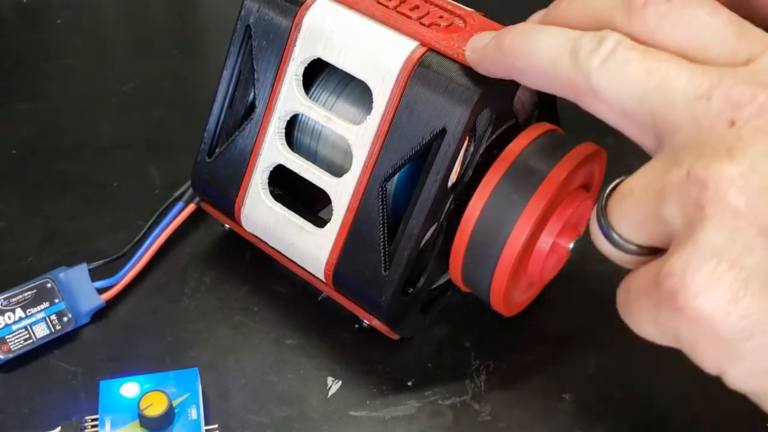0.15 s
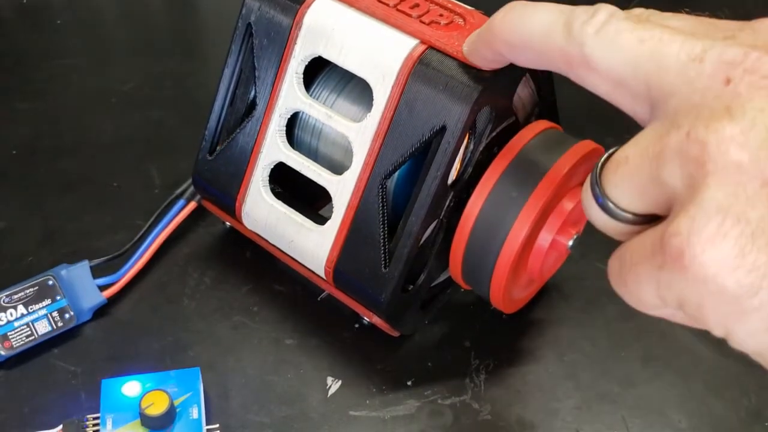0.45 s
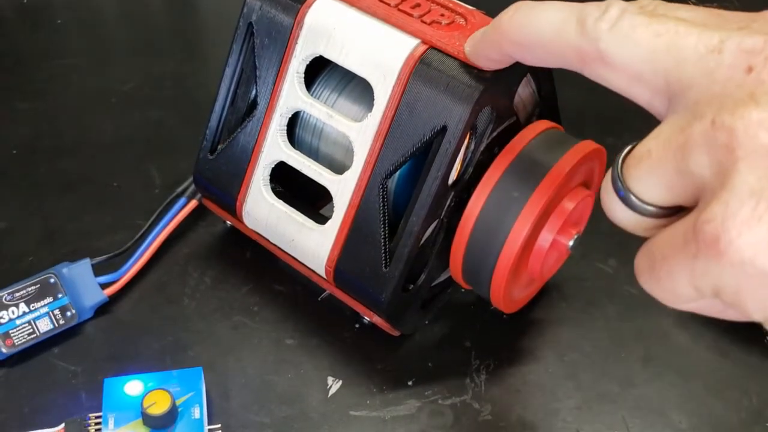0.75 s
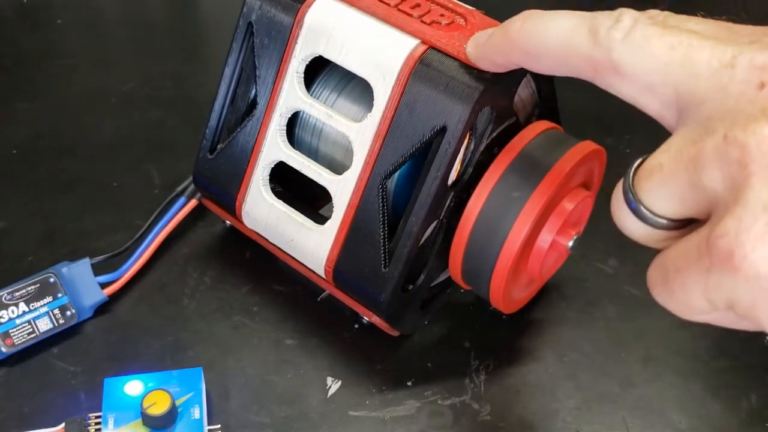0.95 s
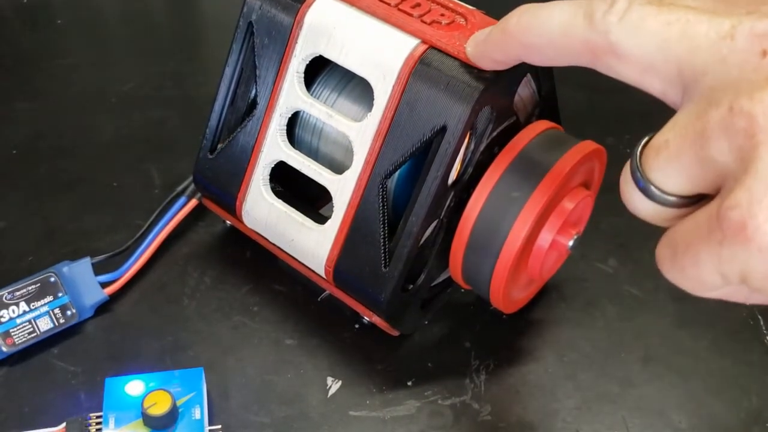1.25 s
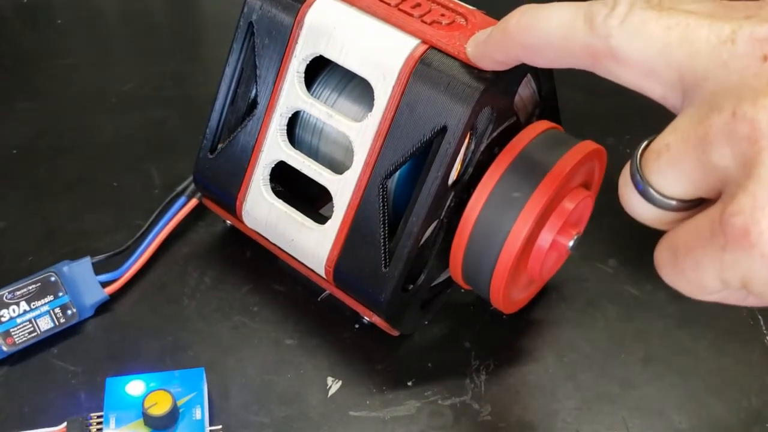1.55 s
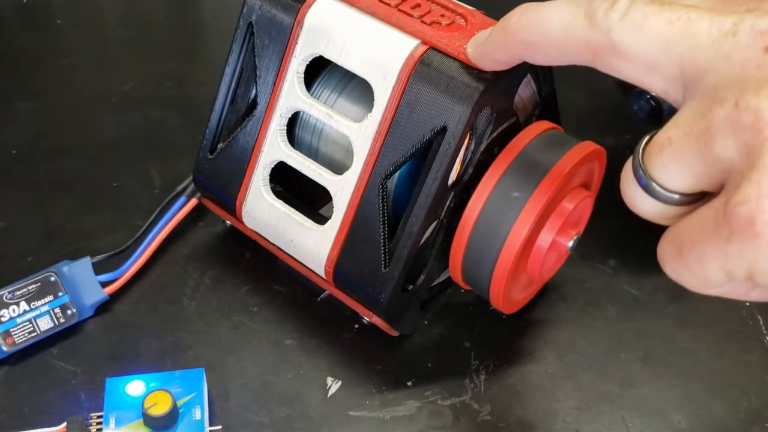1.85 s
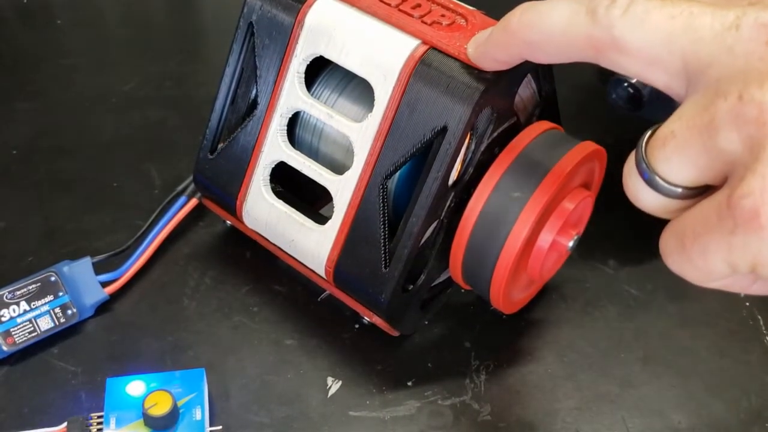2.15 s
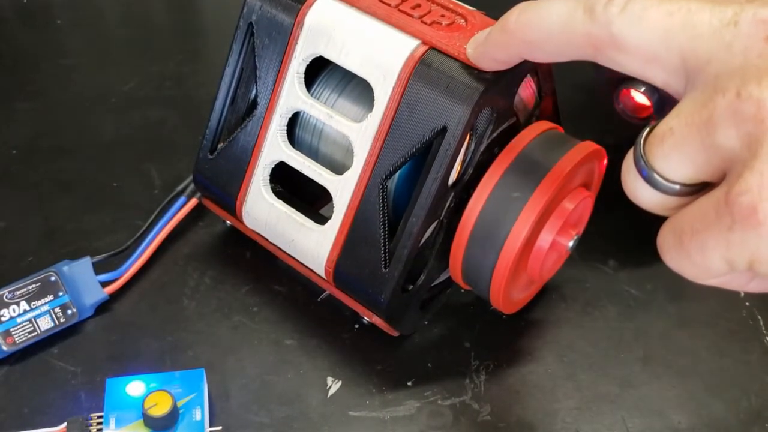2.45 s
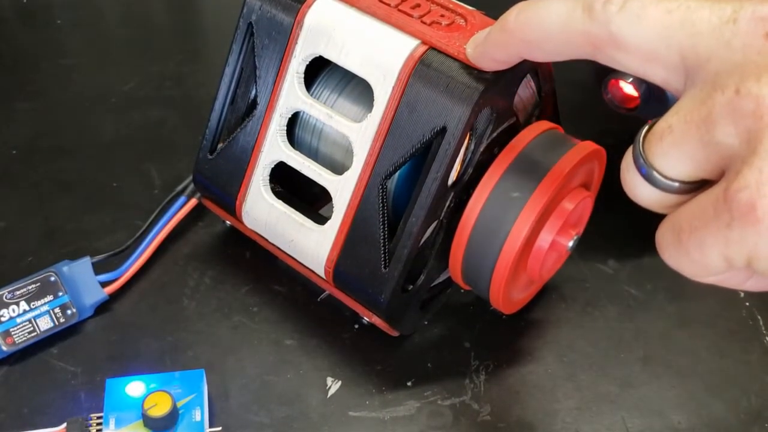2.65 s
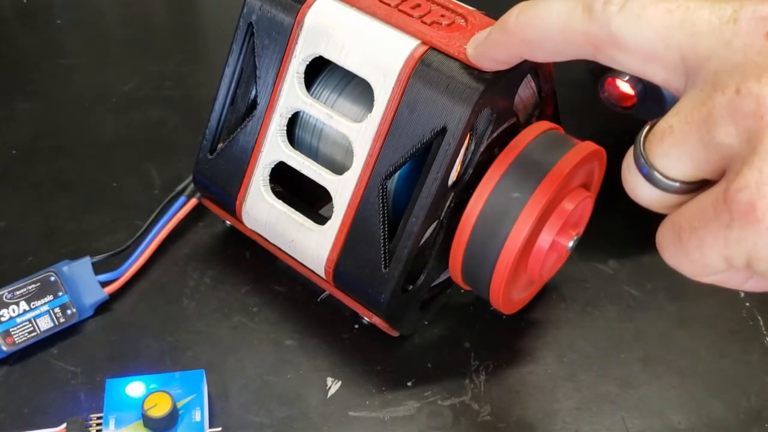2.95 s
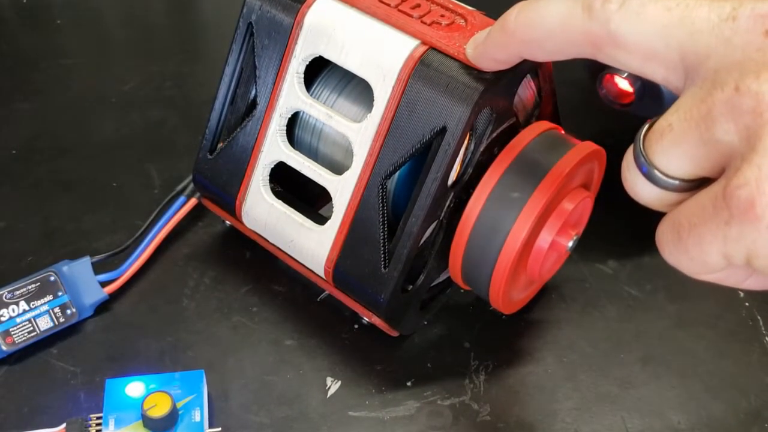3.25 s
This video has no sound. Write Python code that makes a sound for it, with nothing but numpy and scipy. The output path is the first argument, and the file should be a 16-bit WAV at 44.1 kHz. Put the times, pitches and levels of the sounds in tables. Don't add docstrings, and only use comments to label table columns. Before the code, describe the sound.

A small electric motor spins at full speed from 0 to 3.4 seconds without starting or stopping. A hum near 150 hertz carries dense buzzing, whining overtones; loose rotor knocks blur into a hard plastic rattle, with gritty bearing hiss and airy whirr. Pitch creeps up barely, overtones swelling and fading. Low air thuds land left near 1.0 and faintly at 2.4; brief level dips flutter throughout. Close, dry phone pickup, left stronger.

```python
import sys
import numpy as np
from scipy import signal
from scipy.fft import rfft, irfft
from scipy.io import wavfile
from scipy.ndimage import uniform_filter1d, map_coordinates

SR = 44100
rng = np.random.default_rng(int(sys.argv[2]) if len(sys.argv) > 2 else 0)


def invert_db(level):
    return 10 ** (np.asarray(level, dtype=float) / 20)


def generate_wav(signal):
    frames = np.transpose(np.atleast_2d(signal))
    scaled = np.clip(frames, -1, 1) * 32767
    pcm = np.round(scaled).astype(np.int16)
    wavfile.write(sys.argv[1], SR, pcm)


N = 149940


def col(table):
    return np.array(table, float).T


def walk(rate):
    k = int(SR / rate)
    w = uniform_filter1d(uniform_filter1d(rng.standard_normal(N), k), k)
    return w / w.std()


def ring(x, hz, t60):
    pole = np.exp(2j * np.pi * hz / SR - np.log(1000) / (t60 * SR))
    return signal.lfilter([1], [1, -pole], x)


def clicks(times, sizes):
    margin = 16
    out = np.zeros(N + 64)
    at = np.clip(times * SR, 0, N) + margin
    taps = np.floor(at)[:, None] + np.arange(-7, 9)
    d = taps - at[:, None]
    pulse = np.sinc(d) * np.cos(d * np.pi / 16) ** 2
    np.add.at(out, taps.astype(int), sizes[:, None] * pulse)
    return out[margin:N + margin]


def colour(src, table, likeness, lag_ms):
    hz, left, right = col(table)
    bins = np.fft.rfftfreq(N, 1 / SR)
    a, b = rfft(src)
    share = np.interp(bins, *col(likeness))
    late = np.exp(-2j * np.pi * bins * lag_ms / 1000)
    pair = np.array([a, share * a * late + np.sqrt(1 - share ** 2) * b])
    level_db = np.array([np.interp(np.log(bins + 1), np.log(hz), db) for db in (left, right)])
    return irfft(pair * invert_db(level_db) * np.sqrt(SR / 20), N)


def whirr(turns):
    # frequency in Hz, left level in dB, right level in dB.
    whirr_colour = [(40, -85, -83), (113, -51, -60), (252, -59, -65), (624, -56.5, -77),
                    (890, -52.5, -60.5), (2600, -51.5, -67.5), (4050, -53, -59.5), (5100, -68, -59)]
    # frequency in Hz, share of the left heard at the right port (0 to 1).
    whirr_likeness = [(60, .3), (500, 0.93), (2000, 0.15), (5000, 0.36)]
    pulse_db = 0.37 * np.sin(2 * np.pi * (turns - .25))
    src = rng.standard_normal((2, N)) * invert_db(pulse_db + 2.26 * walk(22))
    return colour(src, [(15, -82, -86)] + whirr_colour + [(8900, -76, -76)], whirr_likeness, lag_ms=0.11)


def puffs(t):
    # centre in seconds, level in dB.
    puff_times = [(.01, -48), (.955, -36), (1.04, -31), (.1, -52), (.4, -52), (.7, -52), (.78, -52),
                  (1.19, -52), (1.46, -50), (1.55, -50), (1.78, -52), (1.89, -51), (1.99, -45), (2.09, -52),
                  (2.4, -40), (2.75, -51), (2.84, -51), (3.31, -50), (3.39, -47)]
    puff_hz, puff_s = 60.4, 0.0088
    out = np.zeros(N)
    for s, db in puff_times:
        swell = np.exp(-.5 * ((t - s) / puff_s) ** 2)
        out += 2 * invert_db(db) * swell * np.sin(2 * np.pi * puff_hz * (t - s))
    return out


def grooves(turns):
    points, memory_turns = 300, 55
    keep = np.exp(-1 / memory_turns)
    renew = np.sqrt(1 - keep ** 2)
    fresh = rng.standard_normal((2, int(turns[-1]) + 3, points))
    fresh[:, 0] /= renew
    track = signal.lfilter([renew], [1, -keep], fresh, axis=1)
    return np.array([map_coordinates(row.ravel(), [turns * points]) for row in track])


def rattle(turns):
    # shaft angle in turns, level in dB, decay in turns.
    bursts = [
        (.31, 7.5, 0.12),
        (.43, -3, .1),
        (.6, 11.5, 0.049),
    ]
    # low edge in Hz, high edge in Hz, extra flare in dB.
    flare_bands = [
        (0, 6400, -9),
        (6450, 9400, 4.5),
        (9380, 12500, 0.5),
        (12470, 22050, -2.5),
    ]
    # frequency in Hz, left level in dB, right level in dB.
    rattle_colour = [(3060, -53, -73), (5030, -77, -82), (6400, -66, -80), (6770, -52.5, -58),
                     (8800, -57.5, -56.5), (9900, -52.5, -62), (13100, -50, -55), (15500, -52, -54)]
    # frequency in Hz, share of the left heard at the right port (0 to 1).
    rattle_likeness = [(5000, 0.22), (7100, 0.23), (7700, 1), (9000, 1), (9600, 0.36), (12000, 0.34),
                       (14000, 0.6), (15500, 0.85)]
    repeat, spike_db = 0.58, 2.5
    fresh = rng.standard_normal((2, N)) * invert_db(spike_db * rng.standard_normal((2, N)))
    grit = repeat * grooves(turns) + np.sqrt(1 - repeat ** 2) * fresh / fresh.std()
    bins = np.fft.rfftfreq(N, 1 / SR)
    src = 0
    for lo, hi, flare_db in flare_bands:
        gate = np.ones(N)
        for angle, db, decay in bursts:
            since = (turns - angle) % 1
            gate += invert_db(db + flare_db + 2.4 * walk(70)) * np.exp(-since / decay)
        band = grit * gate * invert_db(0.4 * walk(6.9))
        src = src + irfft(rfft(band / band.std()) * ((bins >= lo) & (bins < hi)), N)
    table = [(1500, -80, -89)] + rattle_colour + [(21900, -40.5, -46)]
    return colour(src, table, rattle_likeness, lag_ms=0)


def knocks(turns, t):
    # shaft angle in turns, left level in dB, right level in dB, ring in Hz, jitter in ms.
    knock_angles = [
        (0.054, -19, -45, 1500, 0.011),
        (0.316, -3, -9, 2390, 0.016),
        (0.434, -10, -14.5, 2747, 0.018),
        (0.609, -6, -14, 3454, 0.031),
        (0.697, -13, -18, 2220, 0.05),
        (0.932, -19.5, -25, 1800, 0.079),
    ]
    # frequency in Hz, T60 in seconds, left level in dB, right level in dB.
    frame_modes = [(325, 0.018, -30, -24), (550, 0.012, -40, -38), (843, 0.015, -29.5, -13.5),
                   (1075, 0.0039, -31, -46), (1600, 0.0064, -24.5, -23.5), (2220, 0.025, -22.5, -47.5),
                   (2560, 0.016, -31, -19), (2860, 0.0067, -20.5, -27), (3463, 0.011, -24, -31),
                   (4050, 0.01, -41, -27.5), (5610, 0.0049, -17.5, -32), (6690, 0.0074, -34, -46),
                   (8500, 0.0062, -54, -35)]
    snap_t60_s, scatter_db, wander_db, right_lag_s = 0.0022, 1.06, 0.75, 0.095 / 1000
    whole = np.arange(int(turns[-1]))
    out = np.zeros((2, N))
    drive = np.zeros(N)
    for angle, left, right, hz, jitter_ms in knock_angles:
        early_late, hardness = rng.standard_normal((len(whole), 2)).T
        at = np.interp(whole + angle, turns, t)
        size = invert_db(scatter_db * hardness + wander_db * walk(6.0)[(at * SR).astype(int)])
        at = at + jitter_ms * early_late / 1000
        out[0] -= invert_db(left) * ring(clicks(at, size), hz, snap_t60_s).imag
        out[1] -= invert_db(right) * ring(clicks(at + right_lag_s, size), hz, snap_t60_s).imag
        drive += invert_db(left) * clicks(at, size)
    for k, (hz, t60, left, right) in enumerate(frame_modes):
        z = ring(drive, hz, t60)
        out[0] += (-1) ** k * invert_db(left) * z.imag
        out[1] += (-1) ** (k // 2) * invert_db(right) * z.real
    return out


def settle(x, turns):
    # multiple of shaft rate (1 to 60), left level in dB, right level in dB, left and right change in
    # dB from start to end.
    order_lines = [(1, -21.5, -27.5, -0.5, 0.0), (2, -30.5, -39, -2.0, -3), (3, -33.5, -44.5, 0.5, 3),
                   (4, -32.5, -42.0, 1.0, -4.0), (5, -32.5, -47, -1.0, -13), (6, -31.5, -34.5, 2.5, 0.5),
                   (7, -28, -31, -1.5, 1.5), (8, -30, -35, 2.5, 2), (9, -36, -46.5, -3, 6),
                   (10, -29.5, -34.5, -2.5, 1.5), (11, -29, -47.5, -0.5, -1), (12, -37, -31.5, 23, 6),
                   (13, -39.5, -32.5, -4, 1), (14, -26.5, -31, -1, -11), (15, -30, -35, -4.5, 3),
                   (16, -31.5, -35.5, 13, -7), (17, -28.5, -36, -4, 11), (18, -36, -35, 2, 9),
                   (19, -28.5, -32.5, -1.5, -3.5), (20, -43.5, -40, -6, 1), (21, -31.5, -57, 1, -1),
                   (22, -37, -49, -13, 2), (23, -33, -36, -14, 7), (24, -27.5, -40, 1.5, -10),
                   (25, -36.0, -52, -3, -7.5), (26, -44, -47, -3, -0.5), (27, -27, -38.5, -3, -1.0),
                   (28, -39, -53.5, 8, 0), (29, -37.5, -61, -6, -1), (30, -44, -50.5, -18, -10.5),
                   (31, -47.5, -59, 15, 11), (32, -49, -56, 18, 10), (33, -44, -48, -1, -4),
                  (34, -60, -70, -5, 0), (35, -38, -55, 0, 1.0), (36, -43, -60, 3, 7),
                  (37, -51, -43, -8, 3), (38, -50, -45, 0, 2), (39, -39, -64, -1, -3),
                  (40, -54.5, -44.5, 6, -2.5), (41, -50, -72, 29, 12.0), (42, -61, -53, -3, 7),
                  (43, -45, -62, -2, 10), (44, -41.5, -53, -4, 9), (45, -39.5, -55, 11, 1),
                  (46, -35.5, -44, -1, -4), (47, -37, -60.0, 10.0, -1.0), (48, -74, -57, 6, -3.0),
                  (49, -41.5, -46, -0.5, -1), (50, -34, -66, -1, 5), (51, -51.5, -64, 3.5, 4.0),
                  (52, -67, -62, -2.0, 7.5), (53, -61, -60, -8, -11), (54, -40, -43.0, -0.5, 3),
                  (55, -39, -42, -6, -5), (56, -42, -46, -3.5, -5.5), (57, -56, -51.5, -0.5, 2),
                  (58, -52, -55, -10, -11), (59, -51, -42, 0.5, -6), (60, -59, -57, -0.5, 3)]
    # frequency in Hz, lead of the left port over the right in radians.
    port_lead = [(150, 0.07), (750, 0.27), (1200, 1.5), (1500, 0.23), (1960, 3.5), (2200, 0.6),
                 (3500, 1.96), (4200, 1.19)]
    out = x.copy()
    rate = turns[-1] * SR / N
    along = turns / turns[-1] - .5
    for row, (_, left, right, *drift) in enumerate(order_lines):
        k = row + 1
        spin = np.exp(2j * np.pi * k * turns)
        have = 2 * (x * spin.conj()).mean(axis=1)
        phase = have[0] / abs(have[0]) if k > 1 else 1
        lag = np.array([0, np.interp(k * rate, *col(port_lead))])
        want = np.sqrt(2) * phase * invert_db([left, right]) * np.exp(-1j * lag)
        sway = invert_db(0.18 * np.sqrt(row) * walk(3.5) + np.outer(drift, along))
        out += ((want[:, None] * sway - have[:, None]) * spin).real
    return out


def scene():
    # time in seconds, shaft speed in turns per second.
    shaft_speed = [
        (0.0, 149.3),
        (.5, 149.8),
        (1.0, 150.25),
        (1.84, 150.9),
        (2.6, 151.35),
        (3.4, 151.75),
    ]
    t = np.arange(N) / SR
    unsteady = 1 + 0.000219 * walk(7.9)
    turns = np.cumsum(np.interp(t, *col(shaft_speed)) * unsteady) / SR
    out = settle(knocks(turns, t), turns) + rattle(turns) + whirr(turns)
    out[0] += puffs(t)
    return out


def top_cut(x):
    return signal.sosfilt(signal.butter(12, 15750, fs=SR, output="sos"), x)


def record(dry):
    # centre in seconds, depth in dB (negative lifts).
    ducks = [(.10, 2.5), (.335, 4.5), (.365, 3), (.445, 3), (.545, 1.5), (.59, 2.5), (.79, 1.5), (.94, 0.5),
             (1.03, -2), (1.08, 0.5), (1.18, 2), (1.29, 1.2), (1.375, 2), (1.59, 2), (1.62, 3.5),
             (1.735, 1), (1.80, 2), (1.96, 1.8), (2.005, 5), (2.11, 2), (2.26, 2), (2.465, 0.5), (2.67, 4),
             (2.73, 3), (2.84, 3), (2.90, 2.2), (3.035, 3.5), (3.165, 3), (3.31, 2.8)]
    duck_s, flutter_db, ceiling = 0.0053, 0.5, .82
    t = np.arange(N) / SR
    duck_db = sum(depth * np.exp(-.5 * ((t - s) / duck_s) ** 2) for s, depth in ducks)
    x = dry * invert_db(flutter_db * walk(64) - duck_db)
    x = x / (1 + (x / ceiling) ** 6) ** (1 / 6)
    x = signal.sosfilt(signal.butter(2, 45, "high", fs=SR, output="sos"), x)
    x = signal.sosfilt(signal.ellip(14, .2, 80, 15750, fs=SR, output="sos"), x)
    return top_cut(x)


dry = scene()
out = record(dry)
generate_wav(out)
```